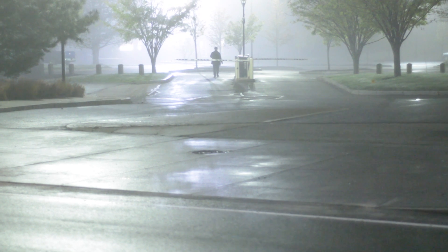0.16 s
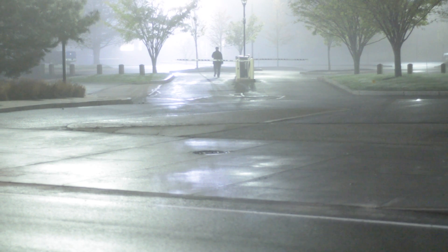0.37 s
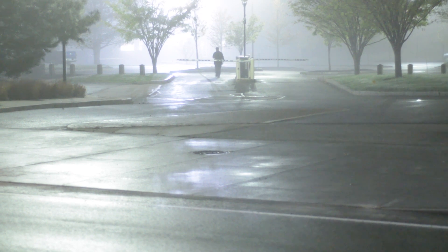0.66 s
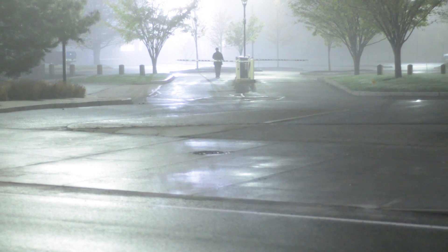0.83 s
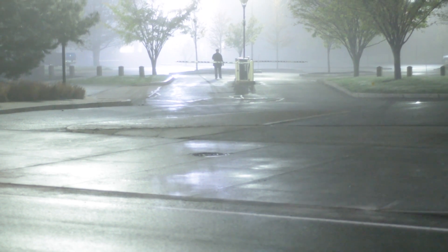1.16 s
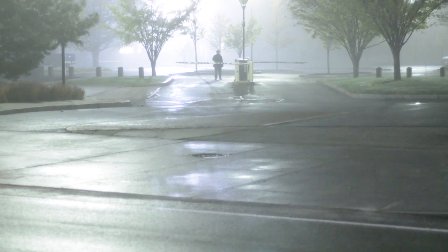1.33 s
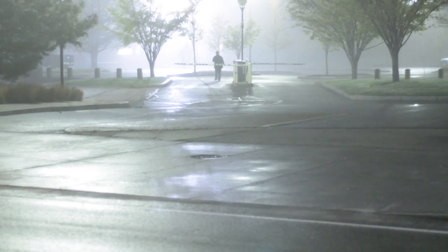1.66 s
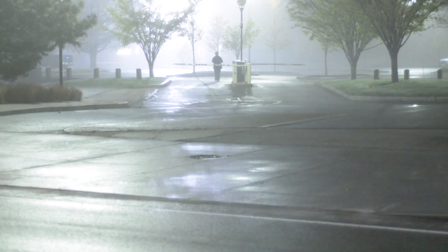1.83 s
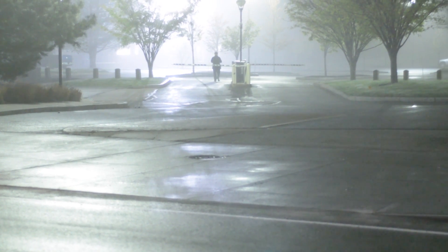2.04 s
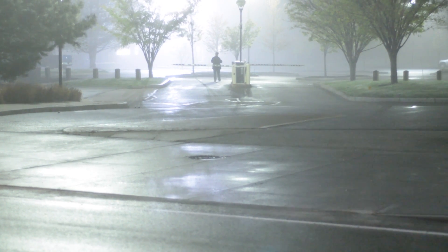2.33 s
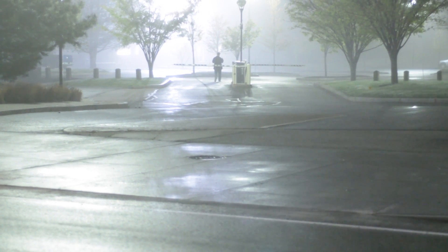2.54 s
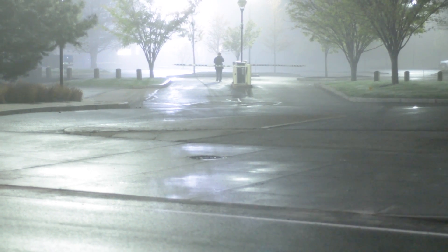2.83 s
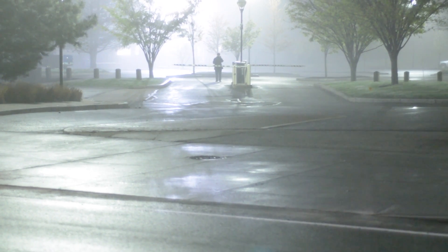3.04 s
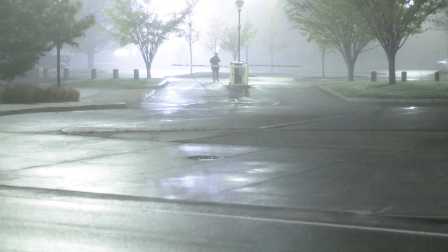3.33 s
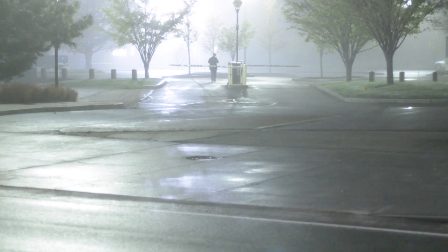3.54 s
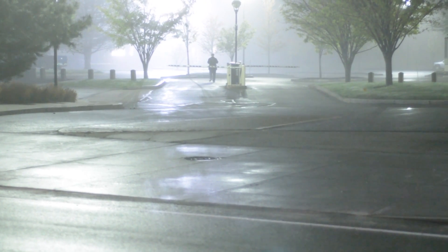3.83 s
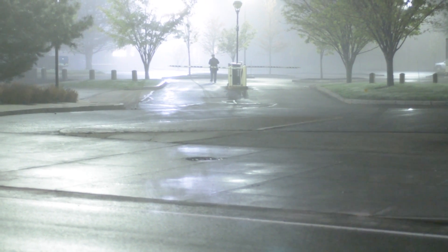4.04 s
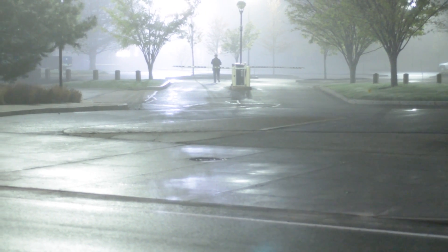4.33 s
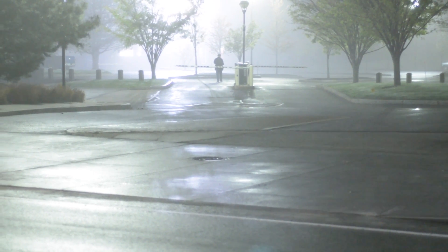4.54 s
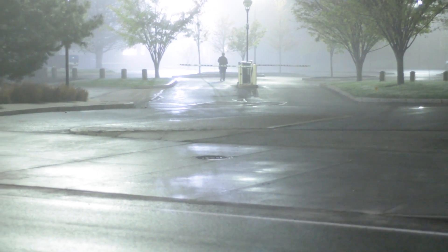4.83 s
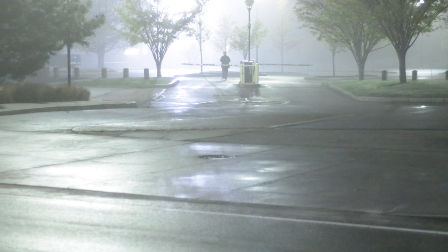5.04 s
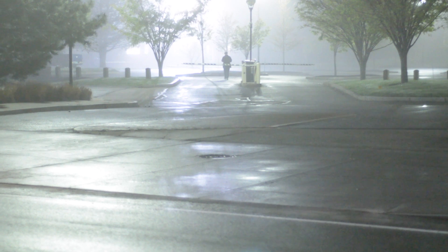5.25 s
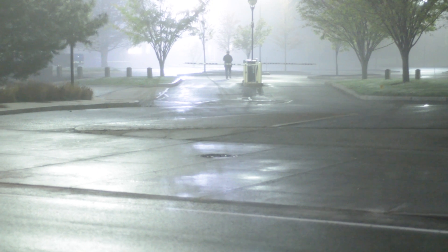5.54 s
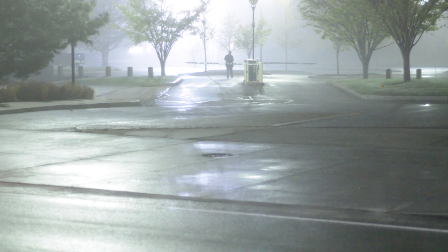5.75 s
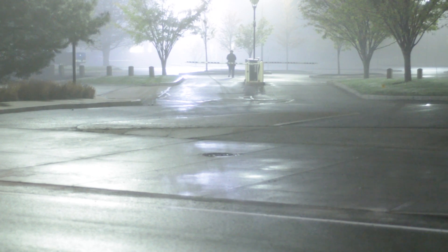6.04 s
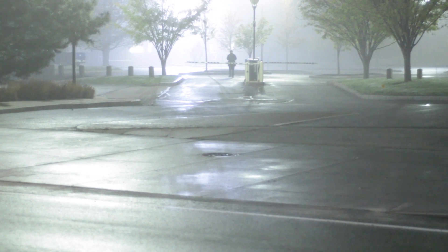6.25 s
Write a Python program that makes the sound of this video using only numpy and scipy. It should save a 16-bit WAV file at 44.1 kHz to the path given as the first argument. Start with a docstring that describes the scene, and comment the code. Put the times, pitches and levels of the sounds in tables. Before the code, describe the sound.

A busy dawn chorus: quick mid-high whistled notes tumble over each other without pause, with distant birds smeared behind them. A few falling ticks come early, then rapid chips and a bright trill just past the middle, then more loud whistles and one thin high call near the end. Soft low road rumble, still-air hiss and a far droning engine lie underneath. Open place with scattering echoes, distant microphone, no footsteps.

```python
"""Dawn chorus in a foggy car park

Thrushes carol from the trees as gliding, arched and breaking whistles, over a wash of 500 blurred far notes.
A sparrow trills and small birds chip, tick and call, as syllables repeated along pitch and level curves.
Nearly every note scatters off trunks and pavement, as sparse random echoes that die away.
Below lie coloured noise for traffic and air, a wavering sine hum, and a far engine that joins in midway."""
import sys
import numpy as np
from scipy import signal
from scipy.fft import rfft, irfft
from scipy.io import wavfile
from scipy.ndimage import uniform_filter1d

SR = 44100
rng = np.random.default_rng(int(sys.argv[2]) if len(sys.argv) > 2 else 0)


def transcribe(u):
    """Save the signal u as a 16-bit wav file named by the first command-line argument.

    u: samples, shape (n,) or (channels, n), limited to [-1, 1]; the rate is SR.
    q: integer samples, one column per channel.
    """
    v = np.clip(np.atleast_2d(u).T, -1, 1)
    q = np.round(v * 32767).astype(np.int16)
    wavfile.write(sys.argv[1], SR, q)


N = 281799
TIME = np.arange(N) / SR

# sparrow trill syllables: start_s, level_db
TRILL = [(3.391, -40), (3.56, -36.5), (3.72, -35), (3.885, -37.5), (4.065, -40.5), (4.246, -40),
         (4.417, -41)]
# whistle of a trill syllable, rising a little, then dropping: from_start_s, pitch_hz, shape_db
WHISTLE = [(.013, 4430, -17), (.023, 4834, -5.5), (.05, 4966, -6.5), (.059, 4950, -7.5), (.066, 3204, 4.5),
           (.074, 2520, -13)]


def from_db(db):
    """Decibels to gain."""
    return 10 ** (np.asarray(db) / 20)


def rms_one(x):
    """Scale to unit power."""
    return x / np.sqrt(np.mean(x ** 2) + 1e-20)


def level(rows):
    """Gain at every sample from (s, dB) rows."""
    return from_db(np.interp(TIME, *np.transpose(rows)))


def add(track, start_s, sound):
    """Mix a sound into a track at a given time."""
    start = int(np.clip(start_s * SR, 0, N))
    track[start:start + len(sound)] += sound[:N - start]


def noise(spectrum):
    """Steady noise of unit power, coloured by (Hz, relative dB) rows."""
    hz, db = np.transpose(spectrum)
    log_bins = np.log(np.fft.rfftfreq(N, 1 / SR) + 1)
    gain = from_db(np.interp(log_bins, np.log(hz), db))
    return rms_one(irfft(rfft(rng.standard_normal(N)) * gain, N))


def sine(hz):
    """A pure tone of random phase that follows a pitch curve."""
    return np.sin(2 * np.pi * (np.cumsum(hz) / SR + rng.random()))


def scatter(x, t60, echoes_per_s):
    """Random echoes from trunks, kerbs and foliage that die away; unit energy."""
    t = TIME[:SR]
    echoes = rng.standard_normal(SR) * (rng.random(SR) < echoes_per_s / SR)
    onset = 1 - np.exp(-t / 0.0021)
    response = echoes * from_db(-60 * t / t60) * onset
    return signal.fftconvolve(x, response / np.sqrt(np.sum(response ** 2) + 1e-20))[:N]


def outdoors(x, near_db, far_db):
    """The direct sound, quick reflections from the caller's tree and a long tail from the woods."""
    near = from_db(near_db) * scatter(x, t60=0.13, echoes_per_s=1100)
    far = from_db(far_db) * scatter(x, t60=1.0, echoes_per_s=500)
    return x + near + far


def note(length_s, pitches_hz, waver=0.0068, waver_hz=90):
    """A whistle that curves through its pitches, swells and fades, with a slight flutter."""
    u = np.linspace(0, 1, max(int(length_s * SR), 10))
    knots = np.linspace(0, 1, len(pitches_hz))
    arc = np.polyval(np.polyfit(knots, pitches_hz, len(pitches_hz) - 1), u)
    flutter = waver * sine(np.full(len(u), waver_hz * (.5 + rng.random())))
    swell = np.abs(np.sin(np.pi * u)) ** .25 * signal.windows.tukey(len(u), .15)
    return swell * sine(arc * (1 + flutter))


def repeat(shape, calls, rasp=0.0065, strain=0.03, break_hz_per_s=22000, overtone_db=-30):
    """One syllable repeated with a faint octave; louder calls pitch higher, steep drops roughen the voice."""
    s, hz, db = np.transpose(shape)
    t = np.arange(s[0], s[-1], 1 / SR)
    curve_hz = np.interp(t, s, hz)
    swell = from_db(np.interp(t, s, db)) * signal.windows.tukey(len(t), .1)
    usual_db = np.mean([call_db for start_s, call_db in calls])
    fall_hz_per_s = np.maximum(-np.gradient(curve_hz, t), 0)
    out = np.zeros(N)
    for start_s, call_db in calls:
        jitter = rms_one(uniform_filter1d(rng.standard_normal(len(t)), size=40))
        tremor = rasp * (1 + fall_hz_per_s / break_hz_per_s) * jitter
        pitch = curve_hz * from_db(call_db - usual_db) ** strain * (1 + tremor)
        tone = sine(pitch) + from_db(overtone_db) * sine(2 * pitch)
        add(out, start_s + s[0], from_db(call_db) * swell * tone)
    return out


def air(level_db=-51.0):
    """Steady noise of still air and microphone hiss."""
    # relative spectrum: freq_hz, density_db
    spectrum = [(250, 2), (480, -6), (950, -11), (1600, -15.5), (4500, -24), (9000, -28)]
    return from_db(level_db) * noise(spectrum)


def traffic(rev=.2):
    """Distant rumble that swells and ebbs; engines run higher when louder, so the noise plays faster."""
    # swell: time_s, level_db
    swell_rows = [(0, -37), (.6, -41), (.85, -36.5), (1.55, -37), (2, -43), (2.25, -39), (2.6, -45),
                  (2.95, -37), (5.6, -36), (6.39, -32)]
    # relative spectrum: freq_hz, density_db
    spectrum = [(20, -6.5), (50, -0.5), (90, 2.5), (135, -9), (190, -11), (280, -27), (2500, -71)]
    swell = level(swell_rows)
    speed = (swell / swell.mean()) ** rev
    rumble = np.interp(np.cumsum(speed), np.arange(N), noise(spectrum), period=N)
    even = rumble / np.sqrt(uniform_filter1d(rumble ** 2, size=SR // 5))
    return swell * even


def hum(pitch_hz=326.3, level_db=-62, waver=0.005):
    """A far machine's faint tone, its pitch wandering slowly."""
    wander = waver * noise([(5, -4), (50, -55)])
    return from_db(level_db) * np.sqrt(2) * sine(pitch_hz * (1 + wander))


def far_engine(peak_hz=98.1, skirt_hz=25):
    """A low, uneven drone: noise in one exhaust resonance."""
    # drone: time_s, level_db
    drone = [(2.8, -68), (2.92, -33.5), (3.3, -42.5), (3.8, -36.5), (4.4, -44), (4.9, -39.5), (5.4, -44),
             (6.3, -34.5)]
    resonance = [(peak_hz / 3, -50), (peak_hz - skirt_hz, -14), (peak_hz, 0),
                 (peak_hz + skirt_hz, -12), (peak_hz * 4, -55), (peak_hz * 20, -110)]
    return level(drone) * noise(resonance)


def far_thrushes(count=500, low_hz=2100, high_hz=3300, glide=0.0851, chorus_db=-4.5):
    """Short curved notes, mostly in mid-range, blurred by the trees into a wash."""
    # swell of the far birds together, before chorus_db: time_s, relative_db
    swell = [(0, -39), (.45, -41), (.7, -43), (1.1, -43.5), (1.75, -42.5), (2.02, -48), (2.2, -37),
             (2.58, -48), (2.85, -38.5), (3.2, -42), (4.8, -43), (5.12, -54), (5.5, -33.5), (5.9, -51.5)]
    out = np.zeros(N)
    for when, length, *pitch in rng.random((count, 4)):
        hz = low_hz + (high_hz - low_hz) * np.mean(pitch)
        bends = 1 + glide * rng.uniform(-1.1, 1, size=3)
        add(out, when * N / SR, note(0.02046 + 0.0468 * length, hz * bends))
    wash = outdoors(out, near_db=-6, far_db=-8.5)
    even = wash / np.sqrt(uniform_filter1d(wash ** 2, size=SR // 12) + 1e-9)
    return from_db(chorus_db) * level(swell) * even


def seep():
    """One thin high call, without echoes."""
    # the call: time_s (before a 2.9 ms delay), pitch_hz, level_db
    shape = [(5.64, 7200, -58), (5.66, 7660, -54), (5.695, 7280, -54), (5.707, 4310, -55)]
    return repeat(shape, [(0.0029, 0)])


def ticks():
    """Quick falling ticks."""
    # start_s, level_db
    calls = [(.563, -43.5), (.603, -49), (0.662, -45.5)]
    # one tick: from_start_s, pitch_hz, shape_db
    shape = [(0, 4850, -19), (.007, 3670, -2), (.014, 3300, 3.5)]
    return repeat(shape, calls)


def chips(lead_s=0.018, lead_db=-19):
    """A small bird's two-part chips, a faint high slur leading into each."""
    # start_s, level_db
    calls = [(3.089, -43.5), (3.224, -41), (3.364, -40.5), (3.51, -40), (3.66, -41.5), (3.811, -43.5),
             (3.986, -42.5)]
    # one chip: from_start_s, pitch_hz, shape_db
    shape = [(0, 3740, -3), (.006, 4160, -5), (.015, 3698, 5.5), (.024, 2957, -6), (.031, 3800, -8),
             (.038, 2950, 11.5), (.045, 2540, 6.5)]
    out = repeat(shape, calls)
    for start_s, db in calls:
        add(out, start_s - lead_s, from_db(db + lead_db) * note(0.03, [5900, 4900]))
    return out


def sparrow_trill():
    """Syllables from both sides of the syrinx: an upsweep over a dropping whistle."""
    # upper side: from_start_s, pitch_hz, shape_db
    upsweep = [(-.004, 3940, -24), (.005, 6020, -8.5), (.015, 7700, -17), (.022, 8350, -25),
               (.058, 8150, -26)]
    return repeat(upsweep, TRILL) + repeat(WHISTLE, TRILL)


def trill_echo(delay_s=0.31, echo_db=-14):
    """The trill's whistle comes back from across the car park."""
    out = np.zeros(N)
    add(out, delay_s, from_db(echo_db) * repeat(WHISTLE, TRILL))
    return out


def small_birds():
    """Trill, chips and ticks scattered outdoors, plus the thin call."""
    sparrow = outdoors(sparrow_trill(), near_db=-3.0, far_db=-8)
    others = outdoors(chips() + ticks() + trill_echo(), near_db=-8.5, far_db=-9.5)
    return sparrow + others + seep()


def arch(length_s, top_hz, sag=0.18, shoulder=0.163):
    """A note that scoops up to a rounded top and drops off it."""
    # sag: share of the top pitch lost at both ends; shoulder: part of the sag reached halfway out
    return note(length_s, top_hz * (1 - sag * np.array([1, shoulder, 0, shoulder, 1])))


def held(length_s, hz):
    """A level whistle, bent only slightly at its ends."""
    return arch(length_s, hz, sag=0.038)


def slur(length_s, start_hz, midway=0.45, usual_octaves=0.32, usual_s=0.0372, stretch=0.54):
    """A falling note, a little steeper late; longer ones fall further, by a power law."""
    octaves = usual_octaves * (length_s / usual_s) ** stretch
    return note(length_s, start_hz * 2 ** (-octaves * np.array([0, midway, 1])))


def drawn(length_s, hz, octaves):
    """A whistle gliding evenly through one pitch."""
    return note(length_s, hz * 2 ** (octaves * np.array([-.5, .5])))


def stepped(break_at_s, lead_s, tail_s, high_hz, low_hz,
            break_s=.0015, swell_db_per_s=70, tail_db=-7, sag_octaves_per_s=1.7):
    """One unbroken whistle swells, flips down to a softer note and sags away."""
    t = np.arange(-lead_s, tail_s, 1 / SR)
    flipped = .5 + .5 * np.tanh(t / (2 * break_s))
    lower = low_hz * 2 ** (-sag_octaves_per_s * (t - tail_s / 2))
    gain = from_db(swell_db_per_s * np.minimum(t, 0) + tail_db * flipped)
    tone = sine(high_hz + flipped * (lower - high_hz))
    out = np.zeros(N)
    add(out, break_at_s - lead_s, gain * signal.windows.tukey(len(t), .1) * tone)
    return out


def near_thrushes():
    """Several birds carol across each other in six kinds of note."""
    # repeated swoops of one bird: crest_s, level_db
    swoops = [(3.718, -36), (3.841, -37), (4.882, -30), (5.009, -36), (5.744, -41.5)]
    # a swoop climbs to its crest and drops to a low tail: from_crest_s, pitch_hz, shape_db
    swoop = [(-.036, 2438, -12), (-.018, 2560, 0), (0, 2694, 1.5), (.013, 2440, -15.5), (.026, 2100, -3),
             (.04, 1920, -10), (.054, 1894, -12.5)]
    # arched notes, often in quick runs: start_s, length_s, level_db, top_hz
    arches = [(0.28, 0.029, -39.5, 3220), (1.116, 0.029, -41, 2134), (1.418, 0.12, -46.5, 2404),
              (1.525, 0.076, -44.5, 2865), (1.696, 0.13, -46.5, 3290), (1.731, 0.059, -40, 2516),
              (1.856, .125, -44.5, 2360), (2.291, 0.037, -42, 2120), (2.343, 0.043, -42.5, 2130),
              (2.635, 0.08, -43, 2344), (2.643, 0.041, -39.5, 3060), (2.779, 0.092, -34.5, 3226),
              (2.868, 0.06, -36.5, 3310), (2.973, 0.046, -32.5, 3135), (3.038, 0.031, -34, 3220),
              (3.077, 0.0436, -34, 3203), (4.297, 0.056, -33.5, 3032), (4.389, 0.062, -51, 2390),
              (4.73, 0.043, -35.5, 3160), (4.806, 0.042, -32, 2974), (4.926, 0.049, -31.5, 2715),
              (5.212, 0.09, -38.5, 3370), (5.647, 0.055, -57, 4380), (5.889, 0.067, -61, 1720),
              (5.985, 0.043, -41.5, 3050), (6.033, 0.15, -46, 2430)]
    # down-slurs: start_s, length_s, level_db, start_hz
    slurs = [(0.331, 0.064, -44.5, 3950), (0.332, 0.059, -43, 2365), (0.383, 0.034, -39, 2720),
             (0.577, 0.023, -43, 2560), (0.837, 0.034, -35.5, 3540), (.871, 0.03, -37, 3330),
             (0.906, .028, -42, 3330), (0.964, 0.022, -39.5, 3530), (1, 0.06, -43.5, 2370),
             (1.014, 0.032, -37.5, 3590), (1.35, 0.023, -42, 3560), (1.902, 0.015, -39, 3320),
             (2.132, 0.043, -37.5, 2766), (2.245, 0.057, -42.5, 3476), (2.39, 0.022, -40.5, 3500),
             (2.443, 0.016, -33.5, 3390), (2.48, 0.02, -35.5, 3210), (3.342, 0.017, -35, 3090),
             (4.834, 0.028, -47.5, 3980), (5.239, 0.045, -42.5, 2670), (5.278, 0.018, -33.5, 3305),
             (5.301, 0.041, -33, 3295), (5.353, 0.017, -35, 3000), (5.391, 0.052, -32.5, 3620),
             (6.223, 0.035, -40.5, 3330)]
    # level whistles: start_s, length_s, level_db, pitch_hz
    held_notes = [(.025, .09, -42, 3436), (0.13, 0.048, -36.5, 2086), (0.392, 0.047, -44.5, 2080),
                  (0.479, 0.04, -39, 2630), (0.698, 0.047, -41.5, 2490), (0.786, 0.055, -42, 2400),
                  (0.791, 0.079, -39, 3374), (1.06, 0.039, -41, 2050), (1.16, 0.055, -39, 3100),
                  (1.234, 0.053, -43, 3567), (1.661, 0.032, -32.5, 3260), (1.794, 0.064, -42, 1980),
                  (2.408, 0.088, -42, 2580), (2.707, 0.047, -50, 1990), (2.991, 0.081, -49, 2250),
                  (5.089, 0.18, -51.5, 2107), (5.099, 0.046, -42, 3090), (5.74, 0.047, -42.5, 3490),
                  (5.802, 0.065, -46.5, 3065), (5.933, 0.054, -48, 3054), (6.252, 0.072, -43.5, 2430),
                  (6.337, 0.079, -40, 2850)]
    # gliding whistles: start_s, length_s, level_db, middle_hz, glide_octaves
    drawn_notes = [(0.017, 0.02, -44.5, 3020, 0.45), (0.036, 0.067, -35, 2135, -0.14),
                   (0.182, 0.027, -27, 2930, .13), (0.276, 0.049, -41.5, 2630, 0.11),
                   (1.106, 0.061, -39, 2964, 0.11), (1.139, 0.12, -43, 2565, 0.0024),
                   (1.596, 0.071, -40.5, 2900, -0.1), (3.396, 0.053, -37, 3200, -.17),
                   (3.455, 0.067, -39, 2490, 0.16), (3.989, 0.029, -35, 3185, -.08),
                   (4.197, 0.074, -48.5, 4100, 0.155), (4.246, 0.069, -38, 2803, 0.045),
                   (4.351, 0.0368, -37, 3010, 0.26), (4.383, .085, -37.5, 3116, -0.16),
                   (4.563, 0.08, -39.5, 2975, -0.26), (4.788, 0.042, -30.5, 2714, -0.086),
                   (5.488, 0.0192, -32.5, 2816, 0.4)]
    # whistles that break downward: break_at_s, lead_s, tail_s, level_db, high_hz, low_hz
    steps = [(0.13, .072, 0.058, -29.5, 2860, 2370), (0.245, .036, 0.032, -32, 3230, 2320),
             (0.459, .026, .092, -34, 2870, 2380), (5.591, .093, 0.073, -30.5, 2995, 2505)]
    out = repeat(swoop, swoops, rasp=0.0066, strain=0.008)
    for voice, rows in ((arch, arches), (slur, slurs), (held, held_notes), (drawn, drawn_notes)):
        for start_s, length_s, db, *pitch in rows:
            add(out, start_s, from_db(db) * voice(length_s, *pitch))
    for break_at_s, lead_s, tail_s, db, high_hz, low_hz in steps:
        out += from_db(db) * stepped(break_at_s, lead_s, tail_s, high_hz, low_hz)
    return outdoors(out, near_db=-7, far_db=-8.5)


def scene(side_hiss_db=-67.5):
    """Everything sits in the centre; only a high hiss, of opposite sign, differs between the ears."""
    background = traffic() + air() + hum() + far_engine()
    birds = far_thrushes() + small_birds() + near_thrushes()
    side = from_db(side_hiss_db) * noise([(2000, -64), (5000, 32)])
    return background + birds + side * np.array([[1], [-1]])


def record(dry, whine_hz=2000, whine_db=-79, cutoff_hz=15800):
    """The electronics whine faintly on harmonics 3 to 5; the ends fade, deepest bass and top are cut."""
    whine = from_db(whine_db) * sum(np.sin(2 * np.pi * k * whine_hz * TIME) for k in range(3, 6))
    fade = np.minimum(np.minimum(TIME, TIME[::-1]) / .005, 1)
    high_pass = signal.butter(2, 18, "high", fs=SR, output="sos")
    low_pass = signal.ellip(12, .1, 80, cutoff_hz, fs=SR, output="sos")
    trimmed = signal.sosfilt(high_pass, (dry + whine) * fade)
    return signal.sosfilt(low_pass, trimmed)


dry = scene()
out = record(dry)
transcribe(out)
```